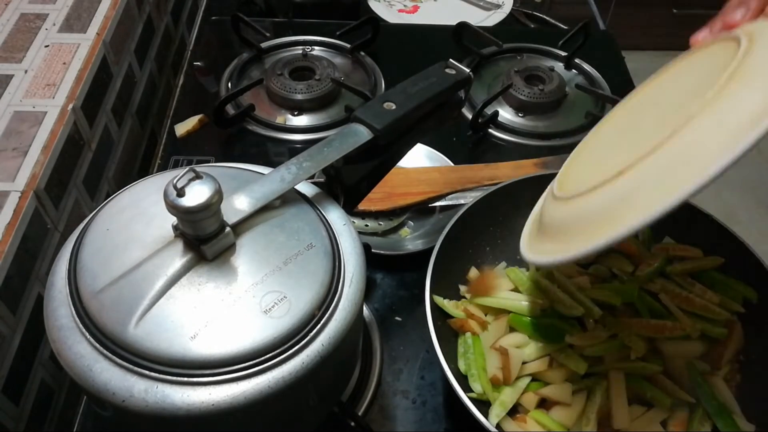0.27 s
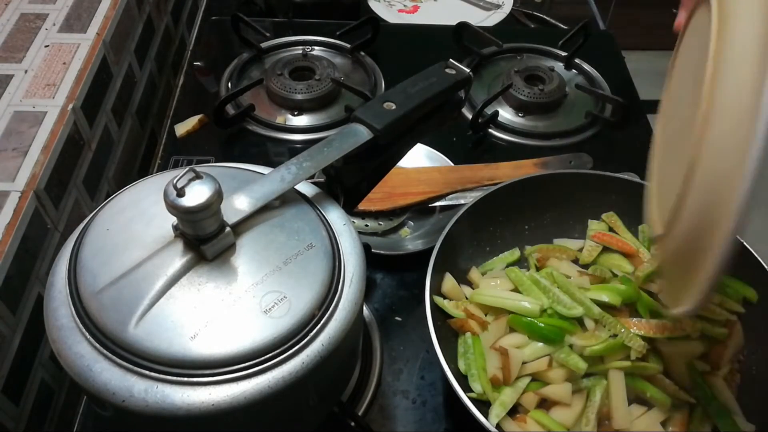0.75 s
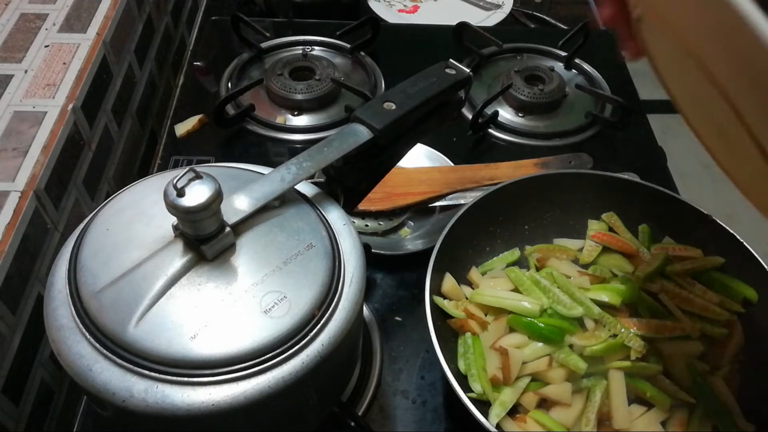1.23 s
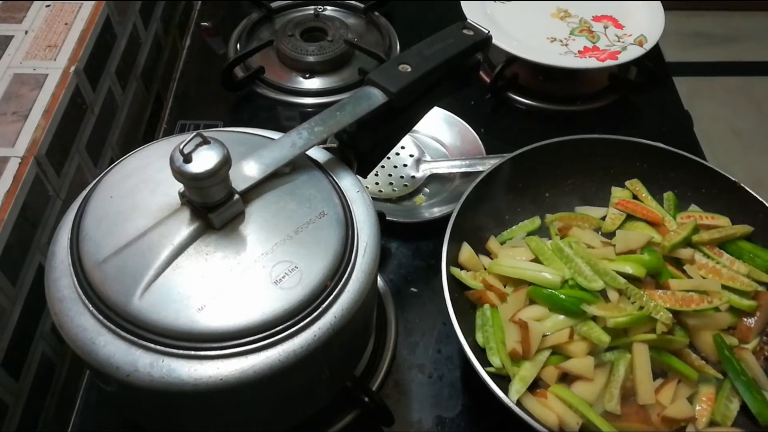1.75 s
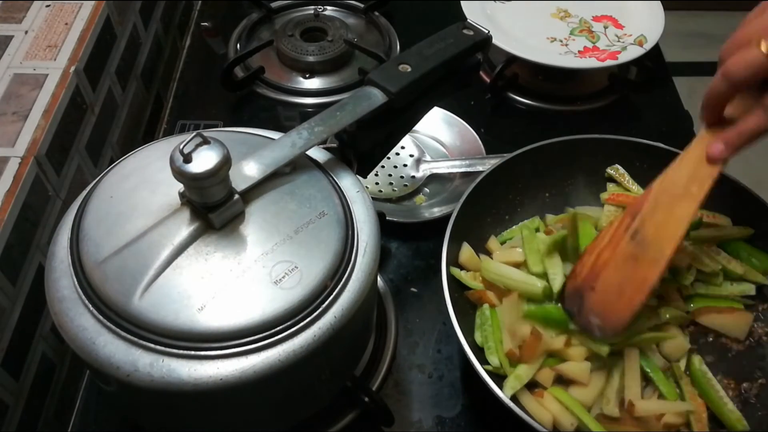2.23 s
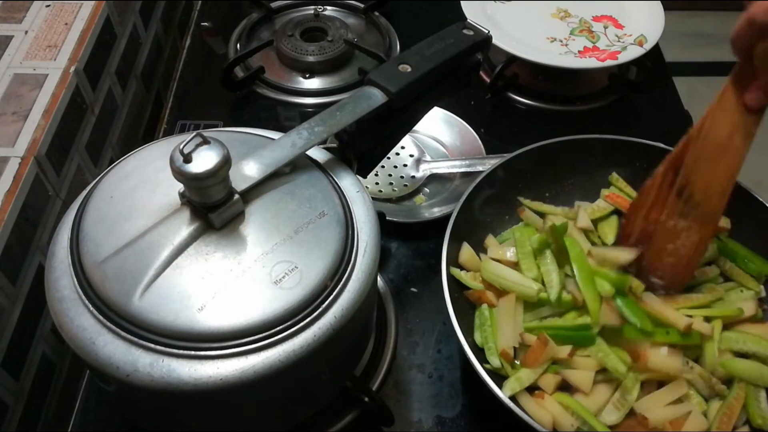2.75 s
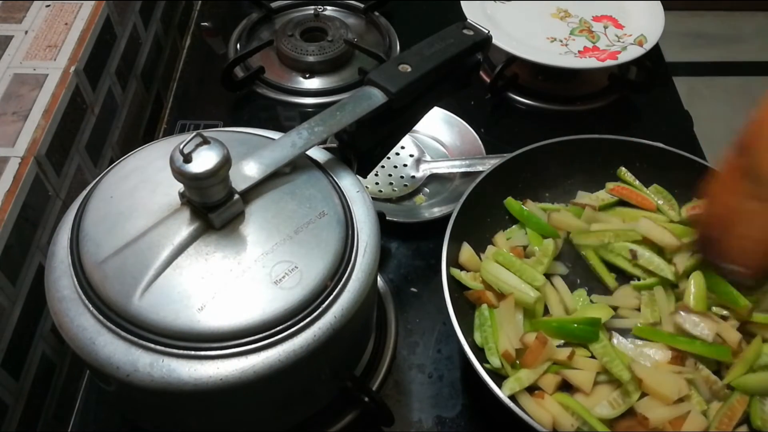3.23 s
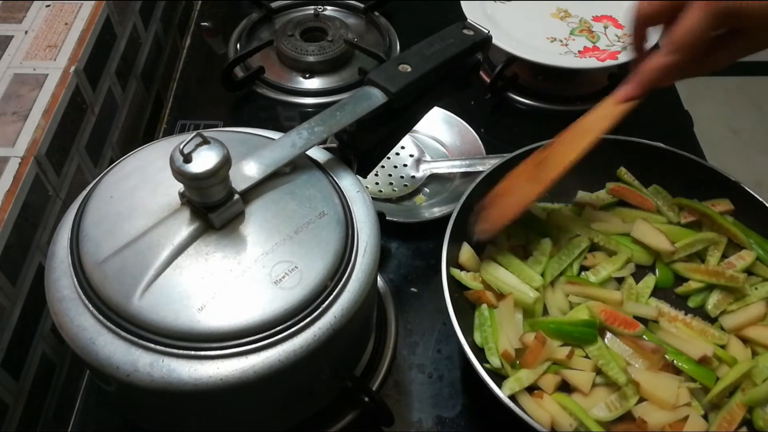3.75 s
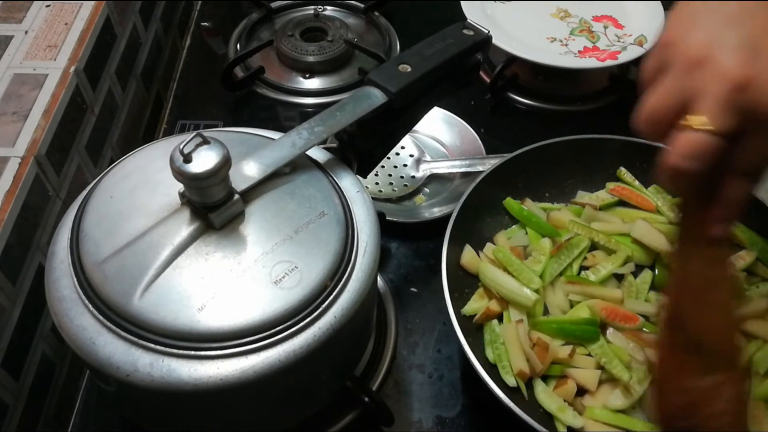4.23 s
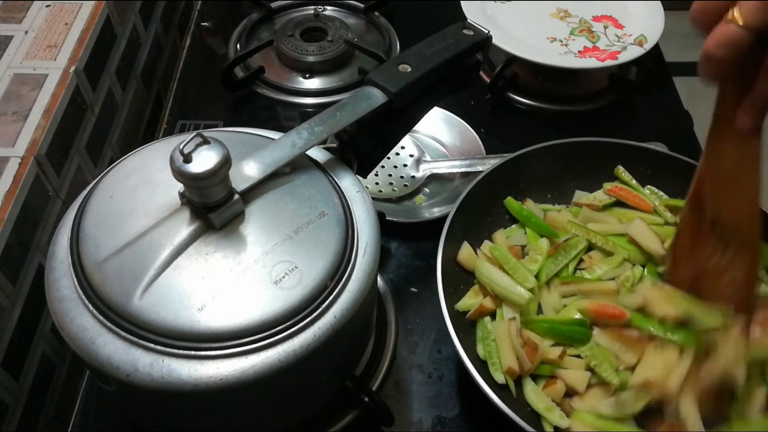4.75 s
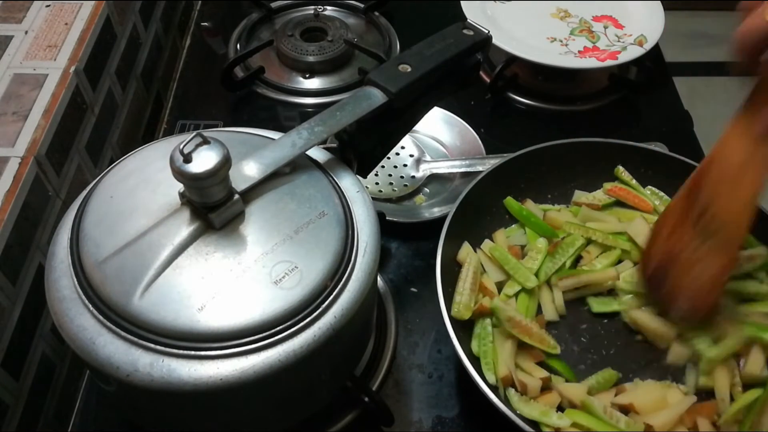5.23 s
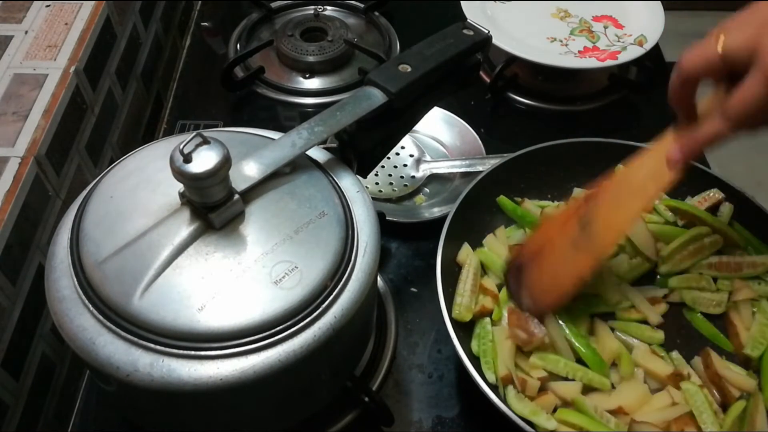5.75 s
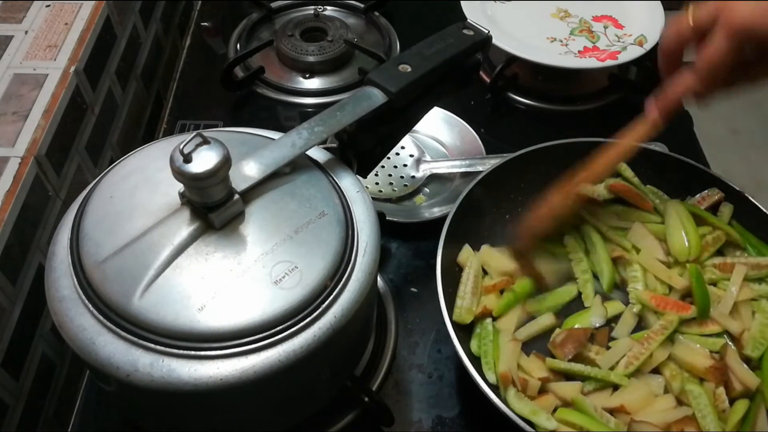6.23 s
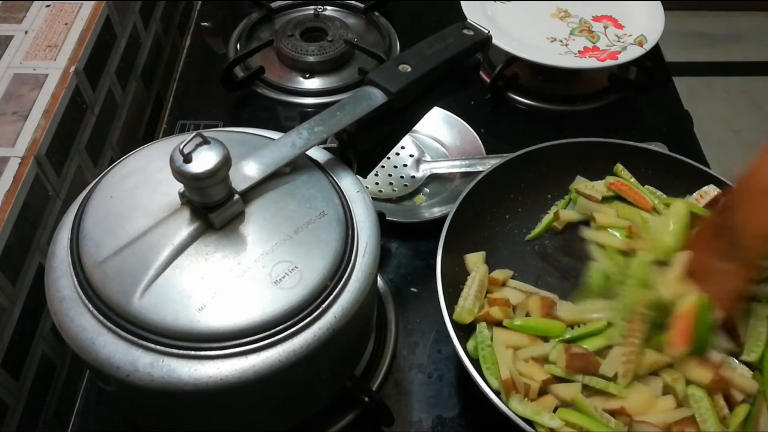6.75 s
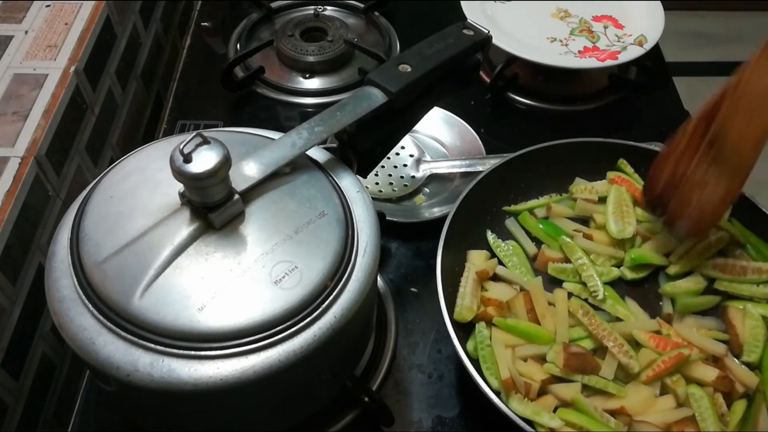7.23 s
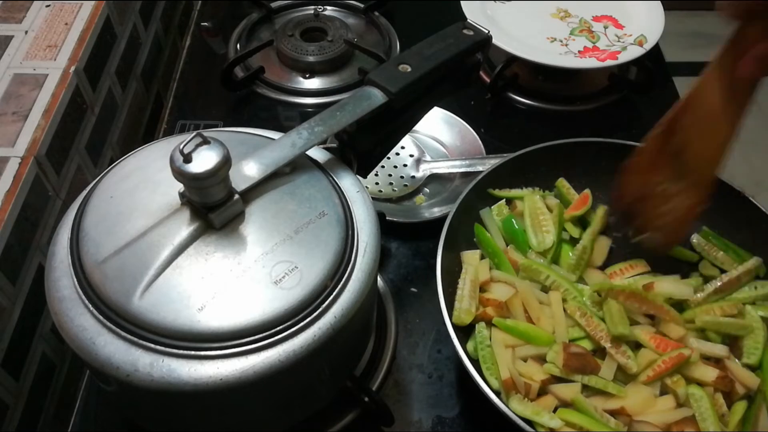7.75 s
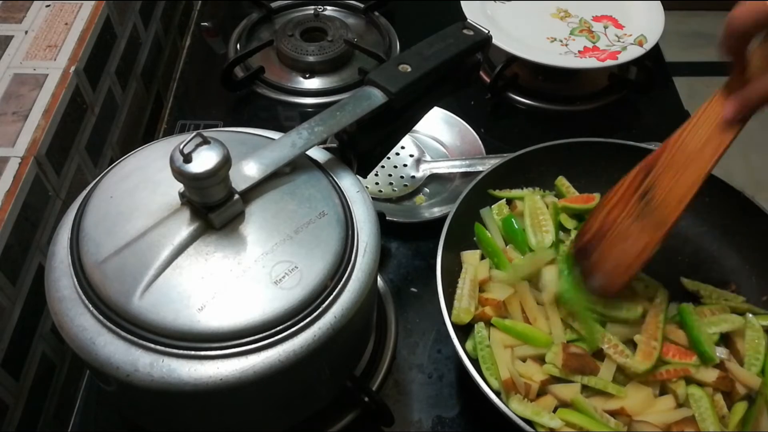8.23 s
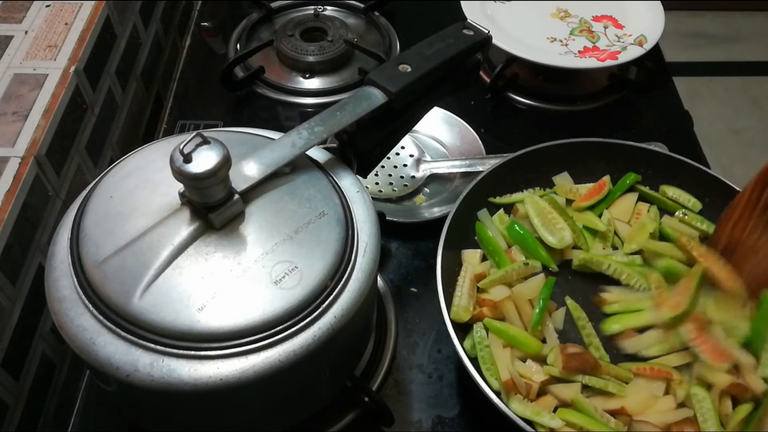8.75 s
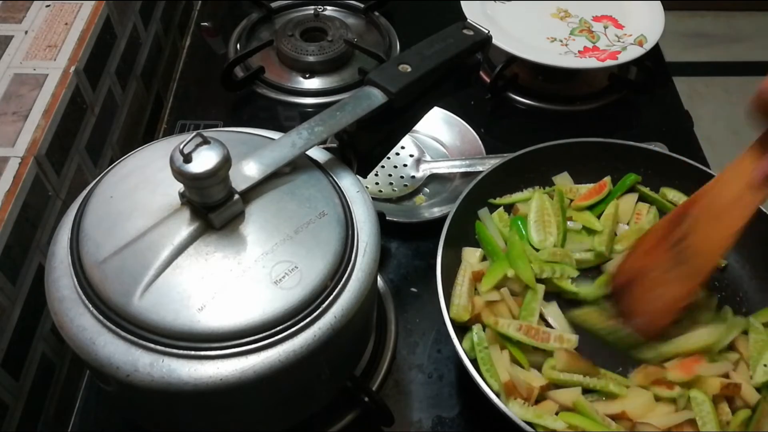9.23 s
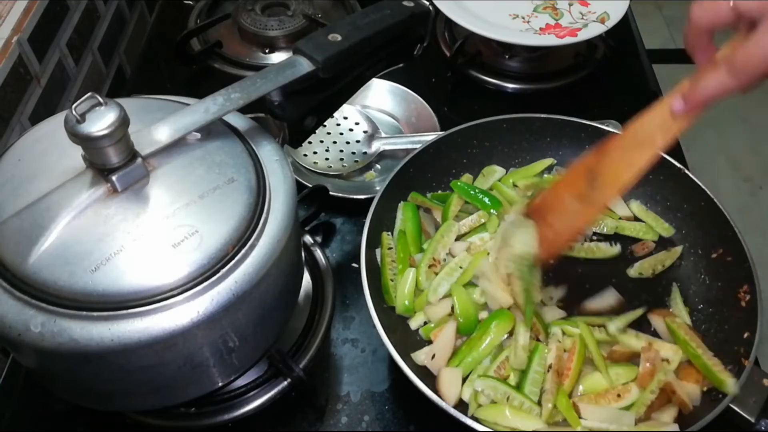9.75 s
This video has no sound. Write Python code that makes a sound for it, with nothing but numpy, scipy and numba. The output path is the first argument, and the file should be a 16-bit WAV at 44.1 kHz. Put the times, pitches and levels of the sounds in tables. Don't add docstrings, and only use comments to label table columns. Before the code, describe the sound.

Close, harsh sizzling in a metal pan on a kitchen stove, fluttering as food is stirred. Water drops explode as crisp snaps, mostly on the right; the left is duller and more scattered until late, when it brightens. One hard plate clack comes early, soft wooden knocks follow, and a rattle of rim taps comes near the end over faint engine rumble.

```python
import sys
import numpy as np
from scipy import signal
from scipy.io import wavfile
from scipy.ndimage import uniform_filter1d, minimum_filter1d
from numba import njit

SR = 44100
rng = np.random.default_rng(int(sys.argv[2]) if len(sys.argv) > 2 else 0)


def volts_from_db(level):
    exponent = np.asarray(level, float) / 20
    return 10 ** exponent


def transcribe(u):
    v = np.clip(np.atleast_2d(u).T, -1, 1)
    q = np.round(v * 32767).astype(np.int16)
    wavfile.write(sys.argv[1], SR, q)


N = 440118


def evened(x):
    return x / np.sqrt(np.mean(x ** 2) + 1e-20)


def read(points, hz):
    f, value = np.transpose(points)
    return np.interp(np.log(hz + 1), np.log(f + 1), value)


def curves(rows):
    s, *columns = np.transpose(rows)
    return [np.interp(np.arange(N) / SR, s, c) for c in columns]


def causal(*spectra):
    hz = abs(np.fft.fftfreq(8192, 1 / SR))
    total_db = np.maximum(sum(read(s, hz) for s in spectra), -70)
    log_gain = np.log(volts_from_db(total_db))
    return np.fft.ifft(np.exp(np.conj(signal.hilbert(log_gain)))).real[:2048]


def conv(x, taps):
    return signal.oaconvolve(x, taps)[:N]


def drift(rate_hz):
    lowpass = signal.butter(2, rate_hz, fs=SR, output="sos")
    return evened(signal.sosfilt(lowpass, rng.standard_normal(N)))


def band_noise(lo_hz, hi_hz):
    bandpass = signal.butter(3, [lo_hz, hi_hz], "band", fs=SR, output="sos")
    return evened(signal.sosfilt(bandpass, rng.standard_normal(N)))


def add(mix, s, sound):
    part = mix[..., round(s * SR):][..., :sound.shape[-1]]
    part += sound[..., :part.shape[-1]]


def bursts(per_s, spread_db, lo_hz, hi_hz, cycles, bare, clump_db, count=10):
    size = volts_from_db(spread_db * np.minimum(rng.exponential(1, N), 4.5)) * rng.choice([-1., 1.], N)
    happens = rng.random(N) < per_s / SR
    size *= happens * volts_from_db(clump_db * drift(285.0))
    kind = rng.integers(0, count, N)
    t = np.arange(600) / SR
    out = bare * size
    for k, hz in enumerate(np.geomspace(lo_hz, hi_hz, count)):
        ring = np.sin(2 * np.pi * hz * t * (1 + 12 * t)) * np.exp(-t * hz / cycles)
        ring = ring / np.linalg.norm(ring) * np.sqrt(hz / hi_hz)
        out = out + conv(size * (kind == k), ring)
    return evened(out)


def diffuse(x, t60):
    keep = volts_from_db(-120 / (t60 * SR))
    energy = signal.lfilter([1 - keep], [1, -keep], x ** 2)
    return np.sqrt(energy + 1e-20) * rng.standard_normal(N)


# delay_s, level_db
BODY_PATHS = [(.00012, 0.), (.00059, -3.6), (.00089, -3.6)]


def ports(x, wet_right_db, wet_left_db, t60):
    round_body = np.zeros(40)
    for s, db in BODY_PATHS:
        round_body[round(s * SR)] = volts_from_db(db)
    left = conv(x, round_body / np.linalg.norm(round_body)) + volts_from_db(wet_left_db) * diffuse(x, t60)
    right = x + volts_from_db(wet_right_db) * diffuse(x, t60)
    return evened(left), evened(right)


# pitch_hz, level_db, width_hz
PAN_MODES = [(665, 2, 35), (825, -3, 25), (903, -1, 25), (1030, -2, 30), (1115, -2, 25), (1170, 0, 25),
             (1250, 0, 25), (1334, 3, 25), (1420, 4, 30), (1690, 2, 30), (1845, 2, 40)]


def pan_ring(x):
    t = np.arange(SR // 8) / SR
    ring = sum(volts_from_db(db) * np.exp(-np.pi * w * t) * np.sin(2 * np.pi * hz * t) for hz, db, w in PAN_MODES)
    return evened(conv(x, ring))


# pitch_hz, left_minus_right_db
FAR_PORT = [(300, -2), (600, -1.5), (900, -5), (1150, -4), (1500, 0), (1900, 0), (2500, -7), (3300, -8),
            (4700, -6), (5500, -9.5), (6500, -10.5), (7800, -15), (10000, -12), (15000, -11)]


def coloured(pair, spectrum):
    left = conv(pair[0], causal(spectrum, FAR_PORT))
    right = conv(pair[1], causal(spectrum))
    return np.array([left, right]) / right.std()


# pitch_hz, level_db
LARGE_BODY = [(700, 9.5), (1200, 26), (2500, 9.5), (4500, 14), (7000, 7), (12000, 13)]


def crackle(per_s, spread_db):
    size = volts_from_db(spread_db * np.minimum(rng.exponential(1, N), 2.)) * rng.choice([-1., 1.], N)
    size = size * (rng.random(N) < per_s / SR)
    scatter = rng.standard_normal(N) * np.sqrt(signal.lfilter([1], [1, -.97], size ** 2))
    return [conv(x, causal(LARGE_BODY)) for x in ports(size + .25 * scatter, -5., 8., t60=.02)]


# centre_s, half_length_s, fizz_change_db, spatter_change_db
FRYING_SWELLS = [(0.112, 0.072, 2, 3), (0.278, 0.035, -0.5, -1), (0.426, 0.11, -0.5, 2), (0.975, 0.071, 1, 3),
                 (1.13, 0.27, -3, -1.5), (1.49, 0.068, 4, 4.5), (1.535, 0.035, 1, 6.5), (2.388, 0.095, 3, 1.5),
                 (2.447, 0.063, 6, 6), (2.69, 0.082, 2.5, -1), (2.84, 0.28, 1, 4), (3.053, 0.098, 1, -2.5),
                 (3.45, 0.16, -3, 1), (3.558, 0.055, 3, 3), (3.708, 0.052, -4.5, -2.5), (4.17, 0.13, 0, -2),
                 (4.286, 0.089, -1, -1), (4.754, 0.13, 1, 3), (4.885, 0.061, -1, 0.5), (5.065, 0.066, 0, -0.5),
                 (5.16, 0.061, -3, -4), (5.898, 0.077, -4, -1), (5.99, 0.24, 2, -0.5),
                 (6.568, 0.052, -0.5, -5), (7.47, 0.1, 2, 4.5), (7.783, 0.057, -1.5, 1.5),
                 (8.3, 0.15, -2.5, -2.5), (7.586, 0.044, 2, 4), (8.846, 0.16, 2, 3), (9.422, 0.029, -3, 2.5),
                 (7.927, 0.1, 3, 3), (3.722, 0.29, -2.5, -1.5), (4.605, .2, 1.5, -1), (6.91, 0.06, -1.5, -0.5),
                 (7.3, 0.085, 0, 2), (8.95, 0.067, -0.5, 0), (5.55, .12, 0.5, 1), (6.1, 0.12, 1.5, -0.5),
                 (9.834, 0.12, 1, 0.5), (0.75, 0.12, -1.5, 0.5), (5.0, 0.21, 2.5, -1), (1.784, 0.058, 4, 1.5),
                 (8.62, .12, 1, -1), (1.105, .04, -2, 0), (5.21, 0.062, -0.5, -2), (9.32, .025, -1.5, -7),
                 (1.27, 0.13, 0.5, -1), (8.857, 0.039, -1, -0.5), (1.8, 0.045, -2, -2), (4.414, 0.15, 0, 0.5)]


def swelling():
    t, out = np.arange(N) / SR, np.zeros((2, N))
    for s, half, fizz_db, fat_db in FRYING_SWELLS:
        hump = np.cos(np.pi / 2 * np.clip((t - s) / half, -1, 1)) ** 2
        out += np.outer([fizz_db, fat_db], hump)
    return out


def patchy(pair, body_db, patch_db, body_hz=3270.0, octaves=0.86):
    hz, t, z = signal.stft(pair, SR, nperseg=512, noverlap=384)
    patches = uniform_filter1d(rng.standard_normal(z.shape[1:]), size=9, axis=0)
    patches = evened(uniform_filter1d(patches, size=16, axis=1))
    bump = np.exp(-(np.log2((hz + 1) / body_hz) / octaves) ** 2)
    swell_db = np.outer(bump, np.interp(t, np.arange(N) / SR, body_db))
    z = z * volts_from_db(patch_db * patches + swell_db)
    return signal.istft(z, SR, nperseg=512, noverlap=384)[1][:, :N]


# pitch_hz, level_db (per Hz)
FIZZ_COLOUR = [(1180, -37), (2000, -18), (2390, -15.5), (2990, -11.5), (5550, -7), (7750, 3), (9200, -5.5),
               (11000, -19), (15500, -27.5)]
# pitch_hz, level_db (per Hz)
SPATTER_COLOUR = [(210, -41), (350, -15), (408, -19), (569, -15), (1080, -5), (1250, -8), (1370, -2),
                  (2400, -2.5), (3000, 0.5), (3900, -92), (6600, -120)]
# start_s, fizz_heat_db, juice_in_oil_db
FRYING_COURSE = [(0, -21, -5.5), (.7, -18.5, -6.5), (1.35, -17, -3), (1.62, -24, 1), (2.2, -21.5, 1.5),
                 (2.6, -20, 0.5), (3.1, -20.5, -0.5), (3.8, -19, -1), (4.5, -23, 3.5), (5.1, -21, 1.5),
                 (5.8, -20.5, -0.5), (6.3, -25, 4), (6.7, -21, 2), (7.4, -21.5, -1), (8.2, -23, 1.5),
                 (9.3, -23.5, 2.5), (9.46, -27.5, 0.5), (9.98, -31.5, 6)]
# start_s, left_lift_db
CAMERA_SWING = [
    (0, 2),
    (1.5, 0),
    (4.9, -.5),
    (5.2, -2),
    (5.5, -0.5),
    (8.22, -0.5),
    (8.3, 5.5),
    (9.98, 6),
]


def sizzle():
    heat_db, juice_db = curves(FRYING_COURSE)
    fizz_db, fat_db = swelling()
    flutter_db = 0.037 * drift(30.0)
    fizz = bursts(9000, 1.9, 2630, 17800, cycles=0.98, bare=0.62, clump_db=1.1)
    fizz = ports(fizz, wet_right_db=-2.5, wet_left_db=9., t60=.04)
    fat = bursts(4000, 3.2, 700, 3500, cycles=1.4, bare=.3, clump_db=1.1)
    fat = ports(fat, wet_right_db=-1.5, wet_left_db=1., t60=.09)
    fat = [x + volts_from_db(-13.) * pan_ring(x) for x in fat]
    fine = coloured(fizz, FIZZ_COLOUR) + volts_from_db(-7.5) * coloured(crackle(300, spread_db=4.), FIZZ_COLOUR)
    swing = volts_from_db([curves(CAMERA_SWING)[0] - .4, np.zeros(N)])
    mix = volts_from_db(8.0 + fizz_db) * fine * swing
    mix = mix + volts_from_db(-11.5 + juice_db + fat_db) * coloured(fat, SPATTER_COLOUR) * swing ** 0.41
    body_db = 0.64 * juice_db + 0.58 * (fat_db - fizz_db)
    return volts_from_db(heat_db + flutter_db) * patchy(mix, body_db, patch_db=0.78)


# start_s, level_db
TRAFFIC = [(0, -57.5), (.67, -54.5), (1.43, -55), (1.5, -48), (1.75, -56), (2.95, -53.5), (3.45, -61),
           (4.22, -62), (4.89, -59.5), (6.73, -64), (6.92, -60.5), (7.98, -60), (8.48, -55), (8.84, -61),
           (9.39, -52), (9.98, -64)]
# start_s, length_s, pitch_hz, glide_hz, level_db
ENGINE_SWELLS = [(.24, .24, 167, 0, -50), (.48, .45, 178, -1, -55), (1.12, .36, 183, -3, -54),
                 (3.15, .3, 176, 0, -54), (3.36, .36, 158, 1, -49), (3.6, .4, 178, 3, -62),
                 (.65, .55, 139, 4, -51), (2.1, .65, 136, 1, -46), (2.75, .75, 129, 8, -52),
                 (-.1, .5, 78, 1, -52), (.85, .35, 77, 0, -53), (1.15, .36, 77, 0, -48),
                 (9.72, .5, 112, 14, -51), (9.7, .5, 190, 12, -52), (9.44, .32, 175, -3, -54)]
# start_s, length_s, pitch_hz, glide_hz, level_db
ENGINE_HUMS = [
    (8.2, .85, 158, 0, -60),
    (1.95, .45, 115, 4, -53),
    (9.36, .9, 38.5, 2, -50.5),
    (8.05, 1.28, 68, -1, -54),
    (1.5, 1.2, 172, 2, -53),
    (3.9, 4.3, 155, 1, -65),
    (2.72, .25, 152, 0, -52),
    (9.44, .42, 98, -2, -50),
    (9.5, .6, 155, 3, -58),
]
# pitch_hz, level_db (per Hz)
ROOM_COLOUR = [(150, -43), (200, -8), (300, 13.5), (500, -5), (800, 9.5), (1200, -21)]


def street():
    upper_db, = curves(TRAFFIC)
    lower_db = -67.5 + 0.43 * (upper_db - upper_db.mean())
    out = np.zeros((2, N))
    for level_db, lo, hi in ((upper_db + 2.5, 95., 205.), (lower_db + 3.0, 22., 100.)):
        shared = band_noise(lo, hi)
        out += volts_from_db(level_db) * np.array([shared + 0.36 * band_noise(lo, hi) for _ in range(2)])
    for table, edge in ((ENGINE_SWELLS, .8), (ENGINE_HUMS, .3)):
        for s, length, hz, glide_hz, db in table:
            u = np.arange(0, length, 1 / SR) / length
            waver_hz = 1.1 * drift(5.)[-len(u):]
            swell_db = 2.2 * drift(6.)[-len(u):]
            phase = 2 * np.pi * np.cumsum(hz + glide_hz * u + waver_hz) / SR + [[0], [.6]]
            note = np.sqrt(2) * volts_from_db(db + swell_db) * np.sin(phase)
            balance = volts_from_db(0.62 * rng.standard_normal((2, 1)))
            add(out, max(s, 0), note * signal.windows.tukey(len(u), edge) * balance)
    air = rng.standard_normal((3, N))
    room = [evened(conv(air[0] + 1.9 * own, causal(ROOM_COLOUR))) for own in air[1:]]
    return out + volts_from_db(-58) * np.array(room)


CEILING_DB, RELEASE_S = -.2, .09

# start_s, gain_drop_db (that the pop forces on the limiter)
LARGE_POPS = [(0.564, -0.5), (1.076, 5), (1.431, 2), (1.493, -1), (1.547, -2), (1.648, 1), (1.763, 4.5),
              (2.484, -7), (2.683, 6.5), (3.111, 3.5), (3.572, 0), (4.271, 4), (4.668, 0.5), (4.795, 4),
              (5.149, 2.5), (5.332, -0.5), (5.426, 1), (5.494, 1.5), (6.519, 1), (7.154, 1.5), (7.59, -0.5),
              (7.984, -7), (8.0719, -3.5), (8.171, 0.5), (8.897, 5), (9.223, -4), (9.302, -0.5)]
# start_s, right_peak_db, left_peak_db
EARLY_BURSTS = [(0.0171, -1, -11), (0.1683, 0, -15), (0.2522, 0, -13), (0.3053, -1, -11), (0.4071, -2, -7),
                (0.4712, 0, -11), (0.5958, -1, -15), (0.7509, -1, -17), (1.2066, -1, -17), (1.3025, -2, -6),
                (1.5686, -1, -16), (1.6084, -1, -20), (1.6617, -3, -16), (1.6858, -1, -16),
                (1.7148, -4, -20), (1.7459, -2, -14), (1.8266, -1, -18), (1.8886, -1, -20),
                (1.9461, 0, -18), (1.9678, -1, -16), (1.9966, -1, -24), (2.019, -1, -19), (2.0546, -1, -21),
                (2.1246, -1, -13), (2.2094, 0, -20), (2.289, -9, -8), (2.5779, 0, -14), (2.8238, 0, -19),
                (2.9293, -5, -10), (3.1296, -1, -11), (3.1378, -2, -13), (3.1945, 0, -23),
                (3.2037, -1, -19), (3.3112, 0, -23), (3.3968, 0, -19), (3.4282, 0, -16), (3.4502, -1, -18),
                (3.5943, -1, -19), (3.6035, 0, -18), (3.6365, -1, -20), (3.6544, -2, -16), (3.6783, 0, -18),
                (3.7235, -4, -14), (3.7421, -2, -16), (3.8156, 0, -19), (3.9139, 0, -18), (3.9335, -1, -16),
                (3.9815, 0, -18), (4.1014, 0, -16), (4.2299, 0, -15), (4.3213, -4, -20), (4.3347, -13, -13),
                (4.3895, -1, -15), (4.4078, -1, -18), (4.5361, 0, -11), (4.5592, -1, -13),
                (4.5662, -7, -10), (4.7329, 0, -10), (4.7535, 0, -22), (4.8492, -2, -19)]
# start_s, right_peak_db, left_peak_db
LATE_BURSTS = [(4.9112, 0, -13), (4.9523, -1, -21), (5.0217, 0, -18), (5.1801, -3, -21), (5.2202, -3, -26),
               (5.2561, -1, -18), (5.2953, 0, -22), (5.3251, 0, -20), (5.4205, 0, -16), (5.4625, -2, -11),
               (5.5509, -1, -19), (5.6643, 0, -11), (5.7797, 0, -13), (5.8382, 0, -16), (5.8782, -1, -12),
               (6.0934, 0, -15), (6.1826, 0, -14), (6.1996, -1, -18), (6.216, -2, -14), (6.2684, -1, -19),
               (6.2967, -1, -15), (6.3755, 0, -15), (6.4132, -2, -19), (6.5251, -1, -20), (6.7143, 0, -18),
               (6.7363, -1, -21), (6.7591, 0, -18), (6.8154, -2, -9), (6.8505, 0, -19), (6.8715, -2, -10),
               (6.9472, -1, -17), (6.9651, -1, -17), (7.0378, 0, -11), (7.2263, -4, -10), (7.2479, -1, -11),
               (7.6276, -1, -17), (7.6566, -2, -16), (7.753, 0, -16), (8.0283, -1, -14), (8.0542, 0, -19),
               (8.0716, -6, -7), (8.1351, 0, -19), (8.1599, 0, -11), (8.1907, -4, -16), (8.2196, -2, -16),
               (8.2511, -4, -14), (8.3092, -4, -14), (8.3869, 0, -15), (8.4337, -1, -10), (8.4961, -1, -15),
               (8.5816, 0, -8), (8.6516, -1, -10), (8.7451, -1, -15), (8.9148, -6, -16), (9.0303, -4, -14),
               (9.2165, 0, -5), (9.2917, -3, -7), (9.4872, -6, -17), (9.9312, -2, -7), (9.9769, -6, -20)]


def pops():
    train = np.zeros((2, N))
    s, db = np.transpose(LARGE_POPS)
    big = np.transpose([s, db + 4., db - 5.])
    for table, lift_db in ((big, 0.), (EARLY_BURSTS, 1.), (LATE_BURSTS, 1.)):
        s, right_db, left_db = np.transpose(table)
        since = s[:, None] - big[:, 0]
        wake_db = np.where(since > 0, big[:, 1] * np.exp(-abs(since) / RELEASE_S), 0).max(1)
        peak_db = np.array([left_db - .5, right_db]) + lift_db + wake_db
        train[:, np.round(s * SR).astype(int) - 8] = volts_from_db(peak_db) * rng.choice([-1., 1.], len(s))
    spray = rng.standard_normal((2, N)) * np.sqrt(signal.lfilter([1], [1, -.96], train ** 2))
    train = train + 0.11 * spray
    near = causal(FIZZ_COLOUR, LARGE_BODY)
    far = np.append(np.zeros(6), causal(FIZZ_COLOUR, LARGE_BODY, FAR_PORT))[:len(near)]
    near, far = signal.lfilter([1], [1, -.55, .36], [near, far])
    out = np.array([conv(x, h / abs(h).max()) for x, h in zip(train, (far, near))]) * volts_from_db(CEILING_DB)
    u = np.arange(SR // 50) / SR / .0013
    add(out, 4.2702, np.tile(-volts_from_db(-28.) * u * np.exp(1 - u), (2, 1)))
    return out


# start_s, peak_db, pitch_hz, t60_s, left_minus_right_db
SPATULA_BLOWS = [(1.456, -44, 285, 0.29, -6), (2.778, -36, 362, 0.2, -9), (2.805, -33, 376, 0.2, -5),
                 (3.864, -36, 323, 0.25, -6), (3.971, -50, 345, 0.25, -3.5), (6.255, -32, 323, 0.25, -5),
                 (6.333, -41, 295, 0.23, -4), (7.701, -38, 313, 0.32, -5), (7.983, -41.5, 310, 0.29, -7),
                 (8.11, -43, 311, 0.35, 2), (8.772, -47, 303.5, 1, -2), (9.35, -36, 353, 0.2, -2.0),
                 (9.393, -41, 329, 0.52, -11), (9.409, -31, 391, 0.2, -1.0), (9.424, -30, 376, 0.13, -4)]
# pitch_ratio, level_db, t60_share
LOADED_PAN = [(1., -1, 0.88), (.94, -15, 1.3), (1.21, -7, 0.58), (1.55, -6, .4), (2.1, -13, .3),
              (2.9, 0, .2), (4.3, -18, 0.18)]
# start_s, level_db, pitch_hz, t60_s
BUMPS = [
    (1.459, -30.5, 152, 1),
    (1.462, -36, 134, .7),
    (1.46, -39, 160, 0.45),
    (1.46, -42, 235, 0.18),
    (1.46, -32, 128, 0.26),
    (15, -37, 101, 0.27),
    (9.76, -49, 250., 0.17),
    (12, -29, 1130., .07),
    (9.36, -18, 2850., 0.043),
]


def knocks():
    out, t = np.zeros((2, N)), np.arange(SR // 2) / SR
    for s, db, hz, t60, pan_db in SPATULA_BLOWS:
        ring = sum(volts_from_db(d - 60 * t / (t60 * share)) * np.sin(2 * np.pi * hz * r * t)
                   for r, d, share in LOADED_PAN)
        scuff = volts_from_db(-13. - 60 * t / .08) * band_noise(300., 1600.0)[-len(t):]
        blow = volts_from_db(db) * (ring + scuff) * np.minimum(t / 0.0028, 1)
        add(out, s - .002, blow * volts_from_db([[pan_db / 2], [-pan_db / 2]]))
    for s, db, hz, t60 in BUMPS:
        thump = volts_from_db(db - 60 * t / t60) * np.sin(2 * np.pi * hz * t)
        add(out, s, np.tile(thump, (2, 1)))
    return out


# start_s, level_db, top_hz, t60_s
RIM_CLACKS = [(1.459, -12, 9000., 0.076), (3.405, -25, 1820, .08), (4.733, -23, 2500., .03),
              (7.699, -28, 2200., 0.11), (9.341, -24.5, 5000., .3), (9.352, -20, 4950, .03),
              (9.364, -24, 5030, 0.02), (9.385, -28, 4540, 0.31), (9.394, -30, 2000., .08),
              (9.404, -28, 1600., 0.11), (9.422, -30, 1610, 0.41)]


def clacks():
    out, t = np.zeros((2, N)), np.arange(SR // 5) / SR
    for s, db, top_hz, t60 in RIM_CLACKS:
        noise = rng.standard_normal((3, len(t)))
        bandpass = signal.butter(2, [900., top_hz], "band", fs=SR, output="sos")
        burst = signal.sosfilt(bandpass, noise[0] + 1.2 * noise[1:])
        add(out, s, evened(burst) * volts_from_db(db - 60 * t / t60) * volts_from_db([[-3.], [1.5]]))
    return out


def walls(pair):
    t = np.arange(SR // 16) / SR
    taps = rng.standard_normal((2, len(t))) * volts_from_db(-60 * t / .07) * (t > .002)
    taps = signal.lfilter(*signal.butter(1, 3500., fs=SR), taps / np.linalg.norm(taps[0]))
    return pair + volts_from_db(-12.) * np.array([conv(x, h) for x, h in zip(pair, taps)])


def scene():
    return walls(sizzle() + pops()) + street() + knocks() + clacks()


@njit
def released(over_db, keep):
    out, held = np.empty_like(over_db), 0.
    for i in range(len(out)):
        held = max(over_db[i], held * keep)
        out[i] = held
    return out


def band_limit(x):
    return signal.sosfilt(signal.butter(12, 15670, fs=SR, output="sos"), x)


def record(dry):
    clipped_db = .7
    peak_db = 20 * np.log10(abs(dry).max(0) + 1e-9)
    over_db = np.maximum(peak_db - CEILING_DB - clipped_db, 0)
    ahead_db = -minimum_filter1d(-over_db, size=41)
    duck_db = uniform_filter1d(released(ahead_db, np.exp(-1 / (RELEASE_S * SR))), size=21)
    mix = np.clip(dry * volts_from_db(-duck_db), -1, 1)
    return band_limit(mix)


dry = scene()
out = record(dry)
transcribe(out)
```